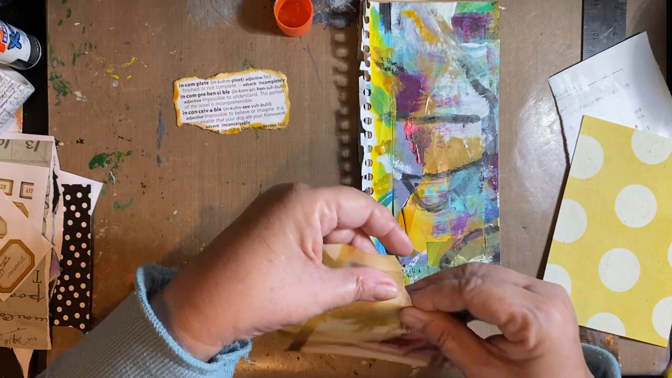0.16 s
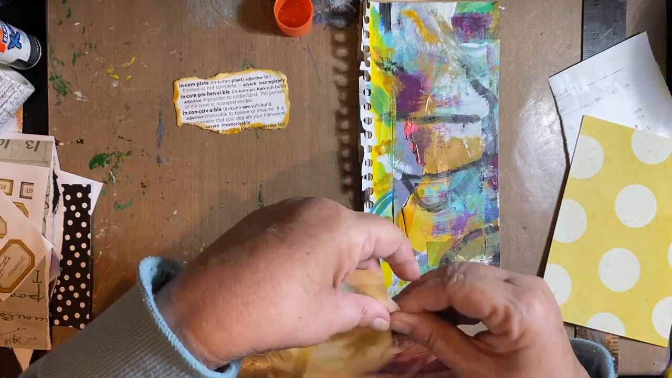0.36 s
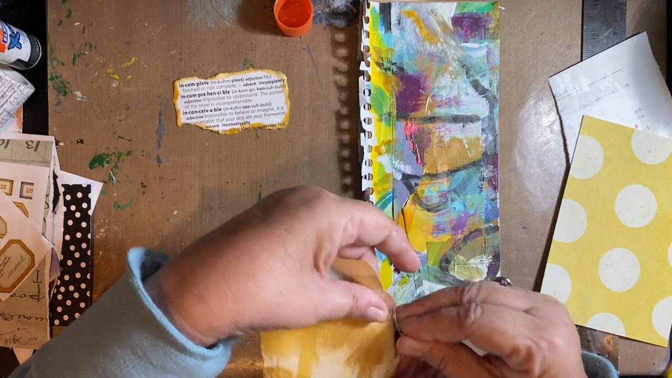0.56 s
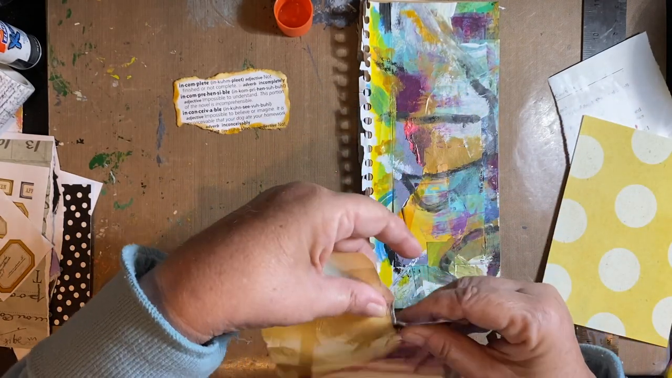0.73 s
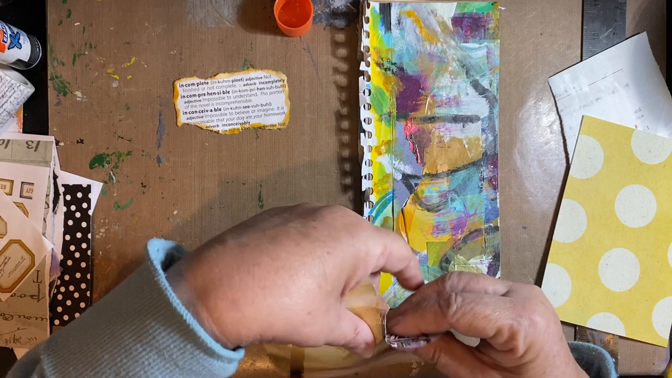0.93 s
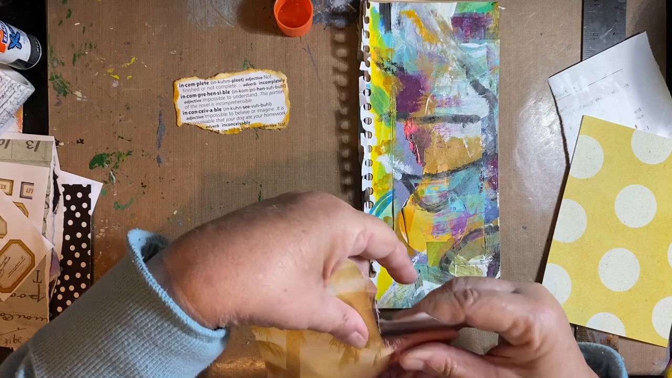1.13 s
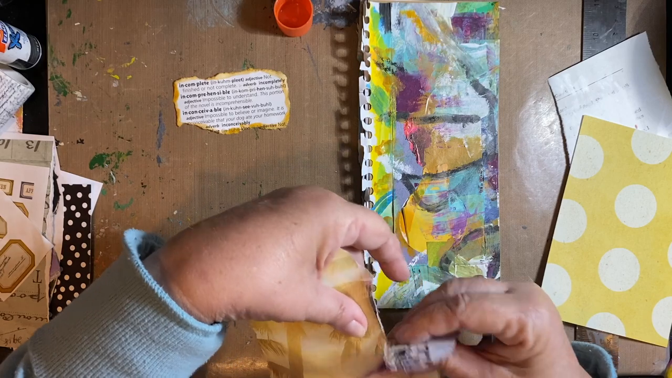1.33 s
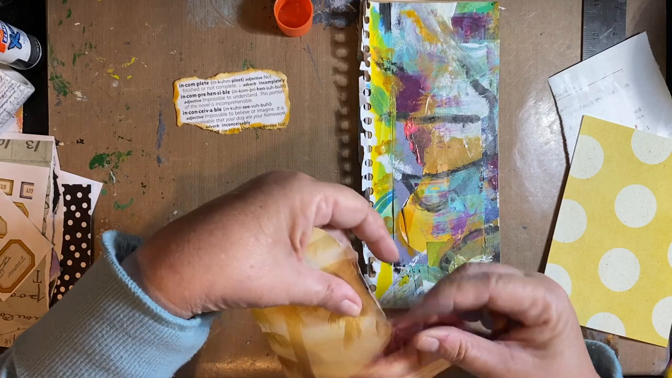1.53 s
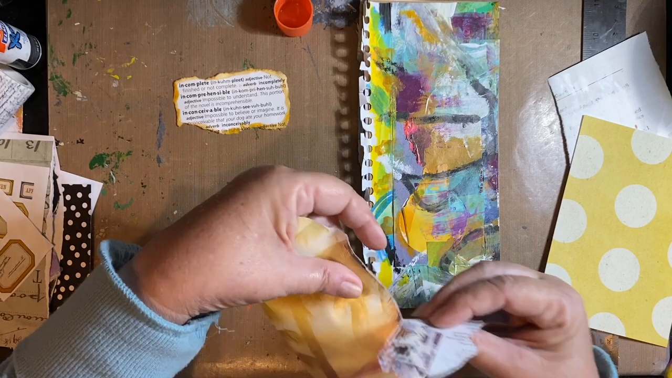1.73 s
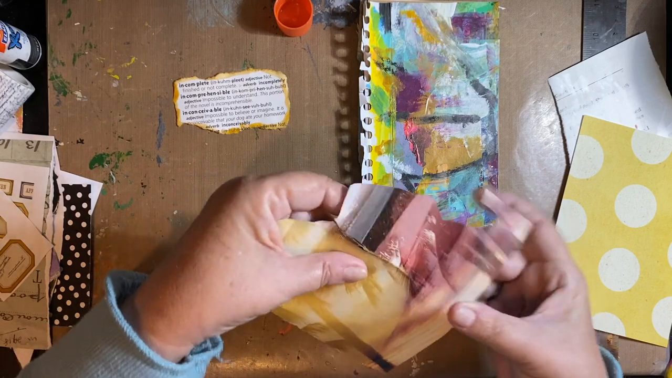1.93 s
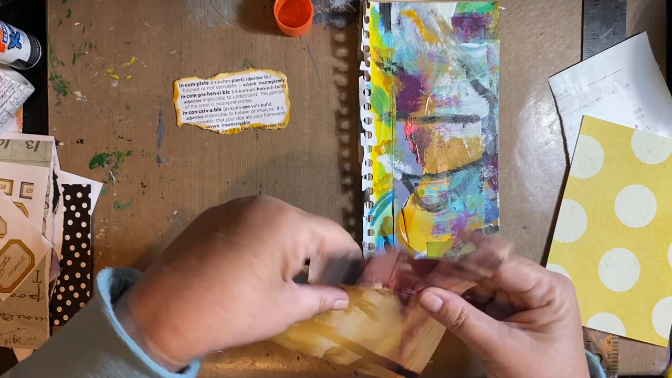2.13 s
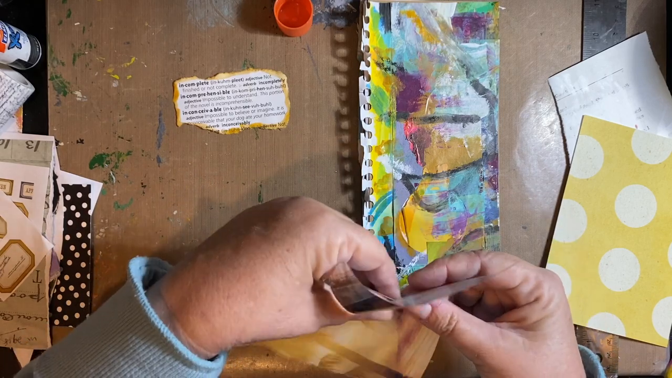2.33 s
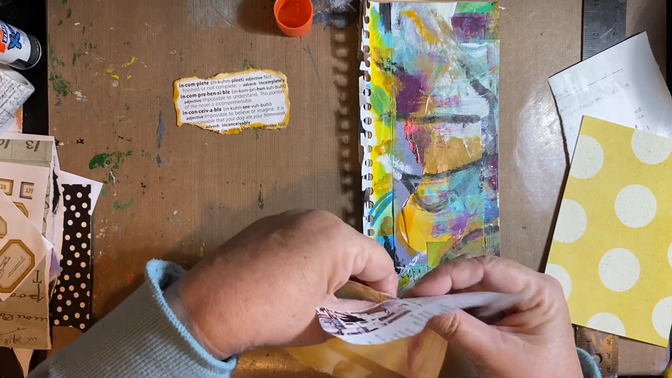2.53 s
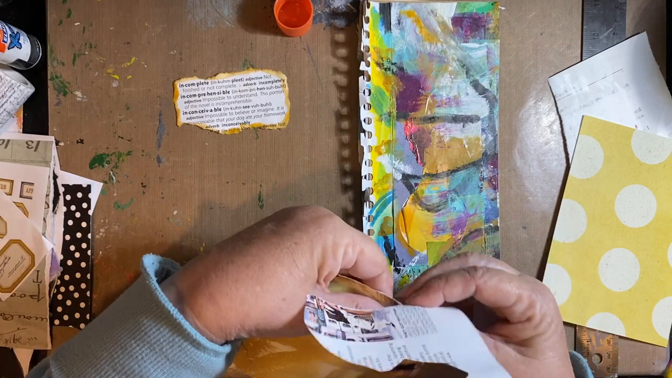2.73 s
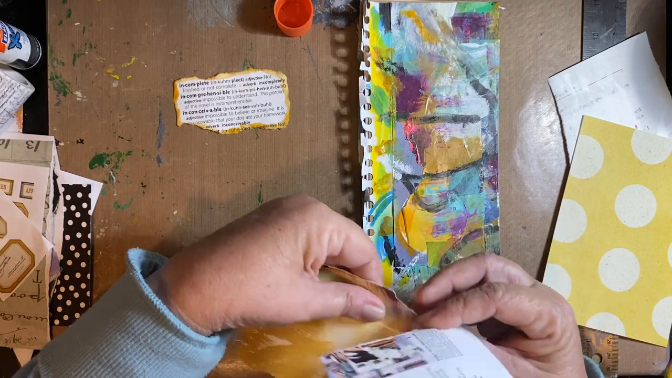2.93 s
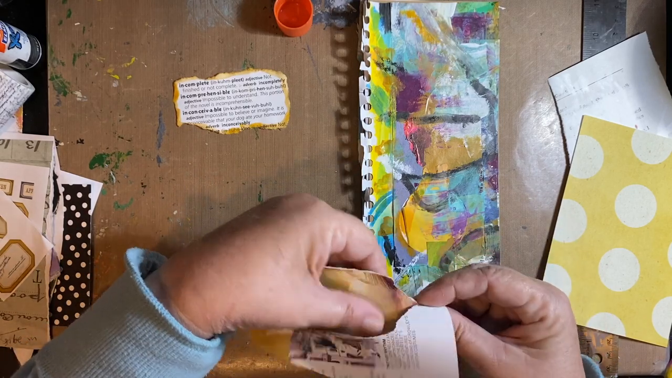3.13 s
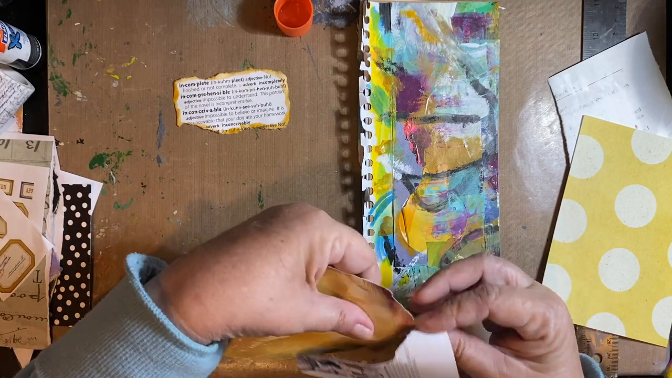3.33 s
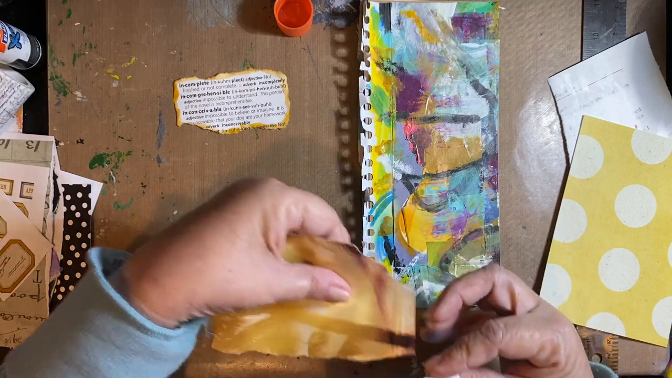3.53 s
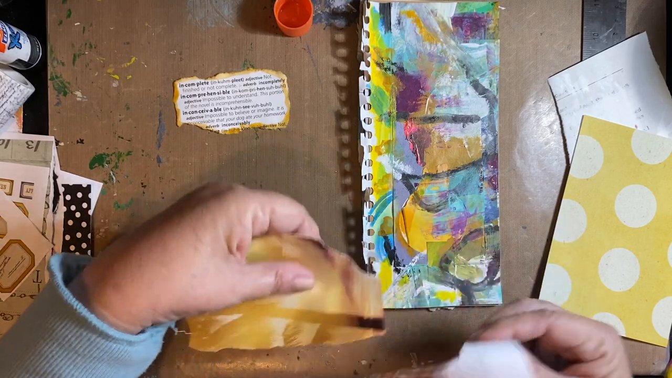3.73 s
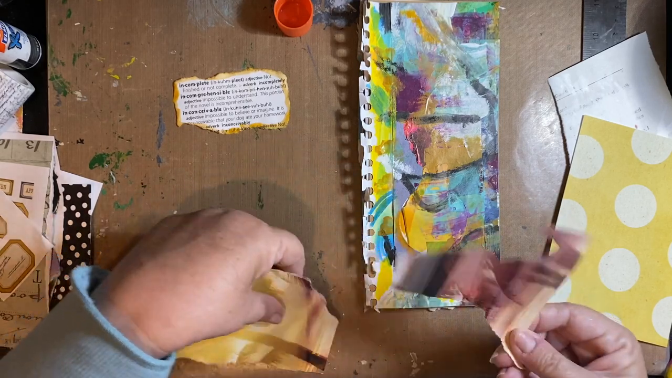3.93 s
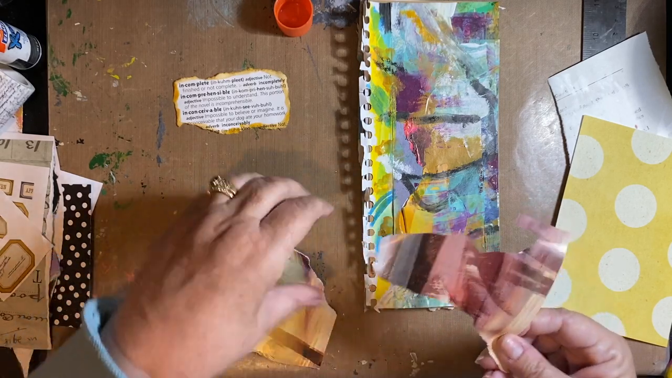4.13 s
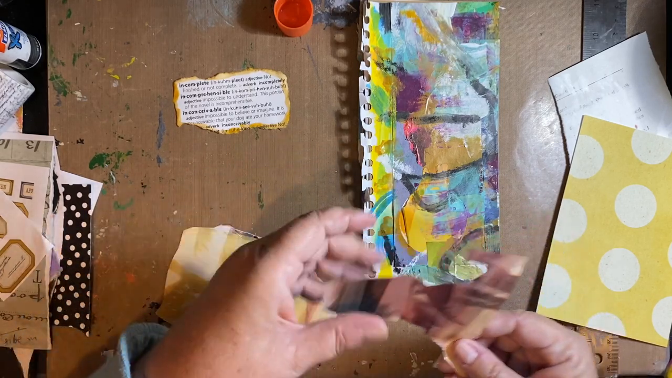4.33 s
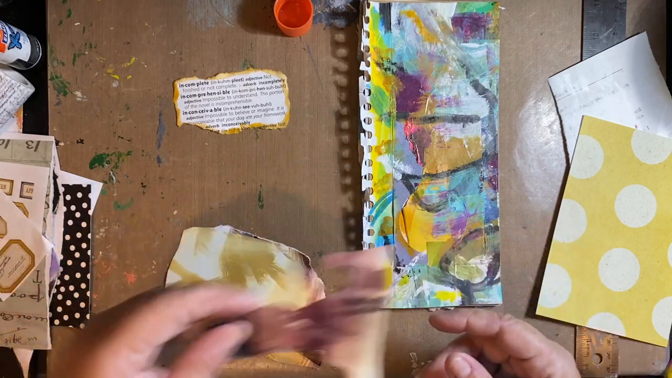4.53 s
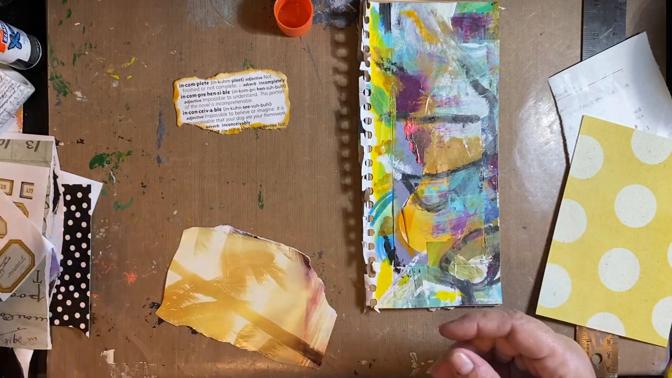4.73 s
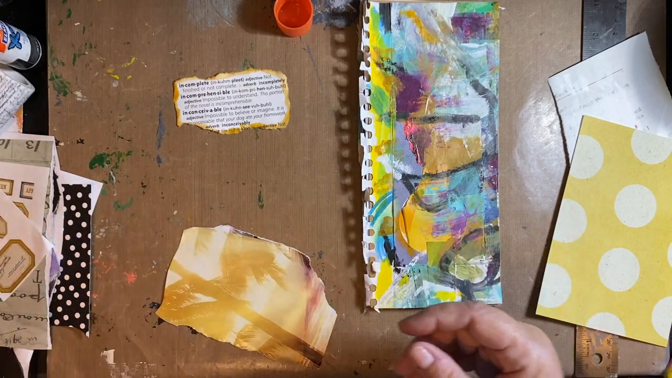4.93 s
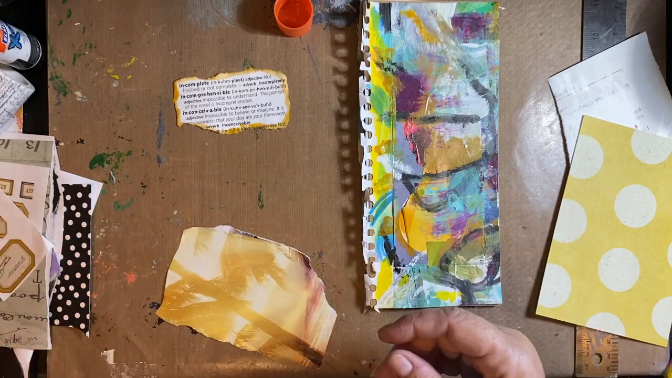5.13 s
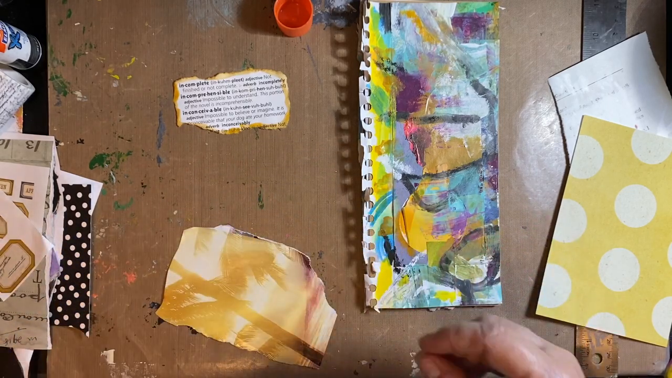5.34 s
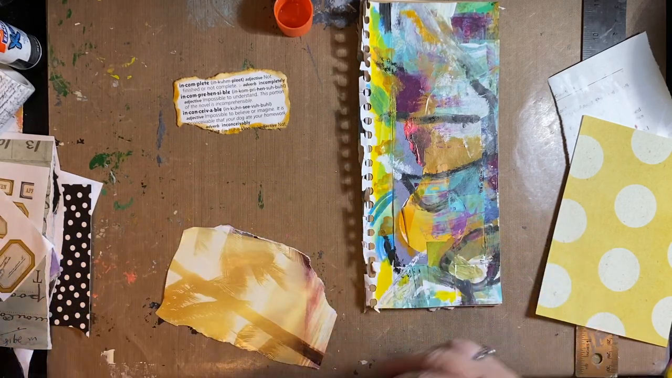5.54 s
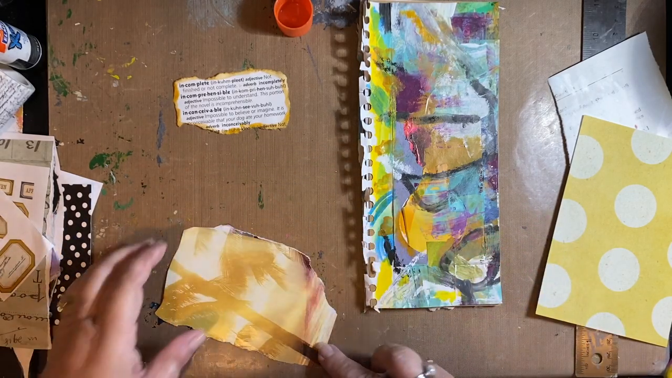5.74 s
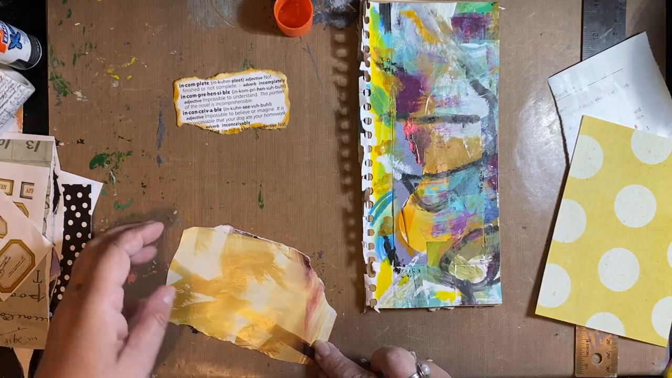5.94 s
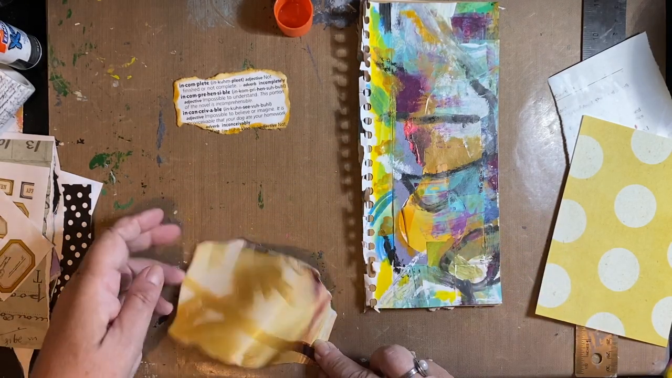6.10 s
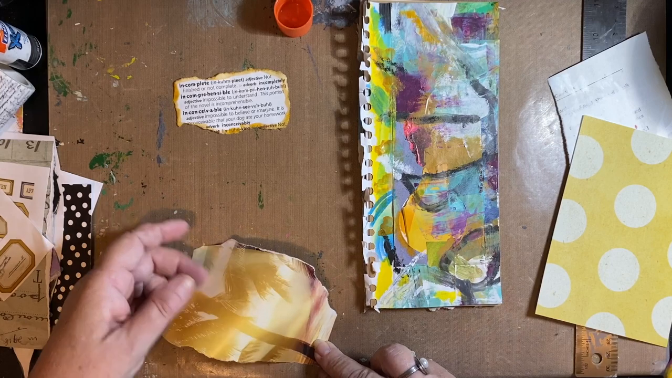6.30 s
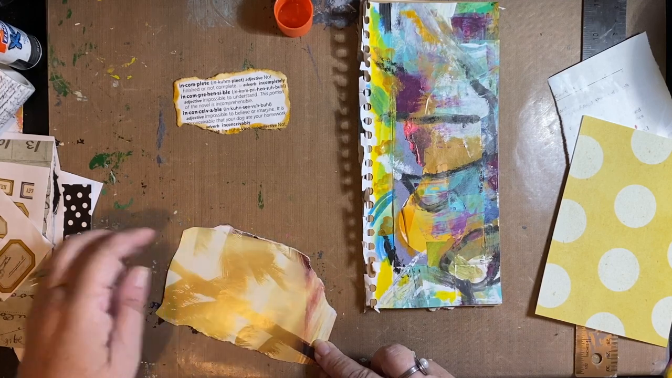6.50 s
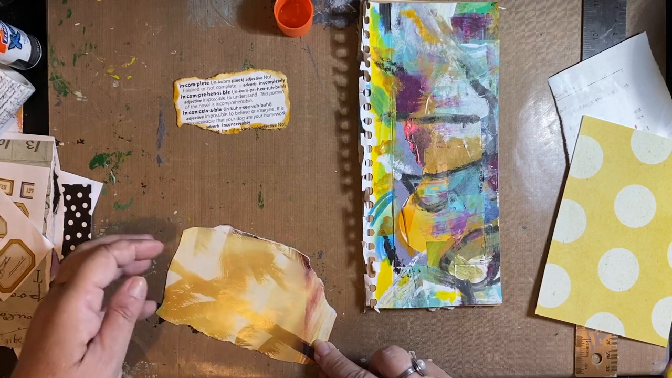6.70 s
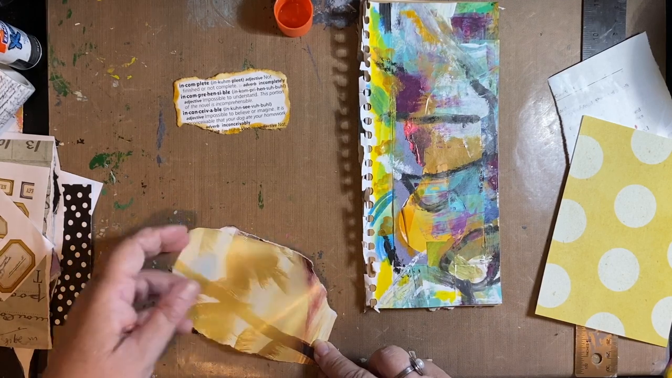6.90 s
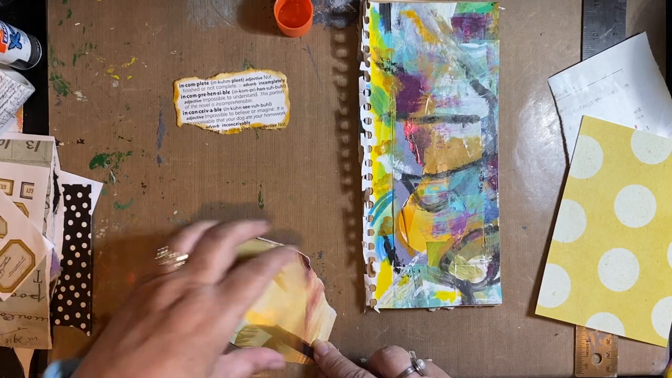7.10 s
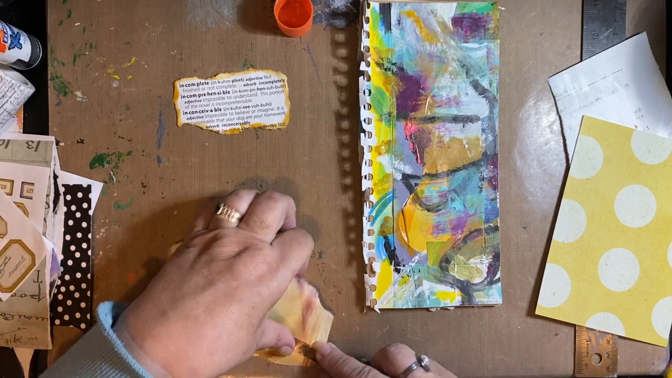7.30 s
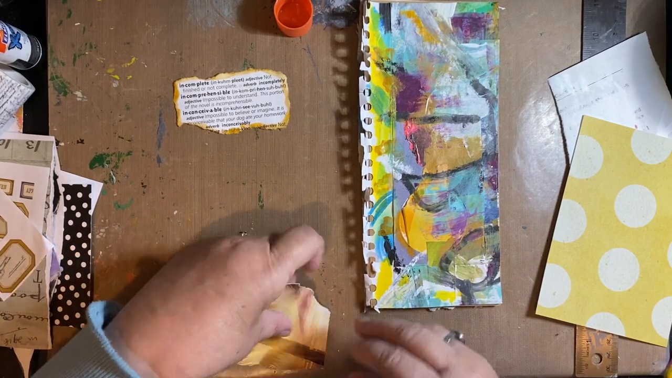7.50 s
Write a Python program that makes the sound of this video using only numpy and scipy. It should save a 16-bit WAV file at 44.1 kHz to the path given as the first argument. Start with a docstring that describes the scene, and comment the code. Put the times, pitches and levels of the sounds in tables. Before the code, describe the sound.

Paper is torn by hand in six short rips, then rustled, slid and pressed onto a wooden table.

```python
"""Tearing paper at a craft table

Hands tear a glossy sheet in six short rips over a wooden table, close under a phone's two mic ports.
Fibres break in stick-slip trains and the held sheet booms and rings. Between rips the paper rustles,
snaps, ticks and taps; later it is nudged, slid and pressed onto the table by a palm.
The room is small and quiet, and answers faintly over a low rumble."""
import sys
import numpy as np
from scipy import signal
from scipy.fft import rfft, irfft, next_fast_len
from scipy.io import wavfile
from scipy.ndimage import uniform_filter1d

SR = 44100
rng = np.random.default_rng(int(sys.argv[2]) if len(sys.argv) > 2 else 0)


def store_wav(level_fs):
    """Save 16-bit WAV to argv[1]."""
    pcm = np.round(np.clip(np.atleast_2d(level_fs), -1, 1) * 32767)
    wavfile.write(sys.argv[1], SR, pcm.T.astype(np.int16))


N = 337806

# spectra of the paper: mid-range body, low boom, fizz of fibres (frequency [Hz], level [dB])
PAPER_BODY = [(500, -25), (900, -3.5), (1500, 0.5), (4000, -2.5), (7000, -4), (9000, -13), (12000, -40),
              (17000, -30.5)]
SHEET_BOOM = [(80, -27.5), (230, -9), (385, 4), (550, -4), (800, -1), (1300, -23)]
FIBRE_FIZZ = [(6000, -14.5), (9000, -4.5), (12000, 4.5), (15500, -2), (17000, -8.5)]


def amp(db):
    """Decibels to gain."""
    return 10 ** (np.asarray(db) / 20)


def unit(x):
    """x scaled to rms 1."""
    return x / np.sqrt(np.mean(x ** 2) + 1e-20)


def along(points, hz):
    """(Hz, value) points read on a log axis."""
    f, v = np.transpose(points)
    return np.interp(np.log(hz + 1), np.log(f + 1), v)


def curves(rows):
    """One value per sample for each column after the time."""
    times, *columns = np.transpose(rows)
    return [np.interp(np.arange(N) / SR, times, column) for column in columns]


def strokes(rows, rise_db_per_s, fall_db_per_s):
    """One gain curve per stroke: it rises, passes three levels and fades."""
    t = np.arange(N) / SR
    return [amp(np.interp(t, row[:3], row[3:6])
                - rise_db_per_s * np.maximum(row[0] - t, 0)
                - fall_db_per_s * np.maximum(t - row[2], 0)) for row in rows]


def filtered(x, response):
    """x times a complex response of frequency."""
    size = next_fast_len(x.shape[-1] + 8192)
    return irfft(rfft(x, size) * response(np.fft.rfftfreq(size, 1 / SR)), size)[..., :x.shape[-1]]


def coloured(x, spectrum):
    """x given a (Hz, dB) spectrum, rms 1."""
    return unit(filtered(x, lambda hz: amp(along(spectrum, hz))))


def modes(rows):
    """The causal response of a few resonances of alternating sign."""
    return lambda f: sum((-1) ** k * amp(db) * 1j * f * width / (hz * hz - f * f + 1j * f * width)
                         for k, (hz, width, db) in enumerate(rows))


def resonance(x, centre_hz, lift_db, width):
    """x through a peak whose centre and height can move; width in natural-log units of pitch."""
    hz, t, z = signal.stft(x, SR, nperseg=512)
    at = np.minimum((t * SR).astype(int), N - 1)
    bell = np.exp(-(np.log((hz[:, None] + 1) / centre_hz[at]) / width) ** 2)
    lift = amp(np.broadcast_to(lift_db, N)[at] * bell)
    z = z * lift / np.sqrt(np.mean(lift[10:80] ** 2, axis=0))  # rms gain 1 over 0.9-6.8 kHz
    return signal.istft(z, SR, nperseg=512)[1][:, :N]


def crackle(per_s, spread_db, t60, bed, patchy_db):
    """Two noises under one train of sudden slips of random size, with drifting patches of colour."""
    chance, size = rng.random((2, N))
    slips = (chance < per_s / SR) * amp(-spread_db * np.log(size + 0.014))
    decays = signal.lfilter([1], [1, -amp(-60 / (t60 * SR))], slips)
    shape = bed + unit(uniform_filter1d(decays, size=16))
    shape /= np.sqrt(np.abs(uniform_filter1d(shape ** 2, size=1500)))  # a steady pull evens the energy
    z = signal.stft(shape * rng.standard_normal((2, N)), nperseg=256)[2]
    patches = uniform_filter1d(rng.standard_normal(z.shape[1:]), size=2, axis=0)
    patches = unit(uniform_filter1d(patches, size=6, axis=1))
    return signal.istft(z * amp(patchy_db * patches), nperseg=256)[1][:, :N]


def room_tone():
    """The air of the room: a faint, steady hiss."""
    # spectrum of the air (frequency [Hz], level [dB])
    hiss = [(200, 4.5), (450, -7.5), (800, -19), (1100, -7.5), (1500, -8), (4000, -11.5), (6000, -14),
            (9000, -17), (13000, -20.5), (17000, -31.5)]
    return amp(-78) * coloured(rng.standard_normal((2, N)), hiss)


def room_answer(x):
    """The walls answer about 6 ms late; the treble dies first."""
    # decay of the room (frequency [Hz], t60 [s])
    decay = [(200, .16), (2000, .13), (10000, .08)]
    hz, t, z = signal.stft(rng.standard_normal((2, SR // 3)), SR, nperseg=256)
    tail = signal.istft(z * amp(-60 * t / along(decay, hz)[:, None]), SR, nperseg=256)[1]
    delayed = np.pad(x, ((0, 0), (250, 0)))
    return signal.fftconvolve(delayed, tail / np.linalg.norm(tail[0]), axes=1)[:, :N]


def table_rumble():
    """The table carries an uneven rumble from arms and house."""
    # shaking of the table (time [s], level [dB])
    shaking = [(0.0, -60.5), (0.28, -60.5), (0.51, -54), (0.7, -56.5), (0.89, -60), (1.0, -55.5),
               (1.43, -58), (1.58, -55), (1.75, -56.5), (2.45, -58), (2.58, -59.5), (3.73, -64),
               (3.88, -58.5), (3.97, -61), (4.1, -57), (4.16, -81.5), (4.3, -81), (4.4, -62), (4.5, -73.5),
               (4.67, -76), (4.88, -66.5), (4.97, -78), (5.03, -68), (5.12, -74.5), (5.29, -62),
               (5.4, -63.5), (5.91, -61.5), (6.34, -66.5), (6.45, -69.5), (6.62, -64.5), (6.75, -58.5),
               (6.88, -55.5), (6.95, -71), (7.05, -68.5), (7.15, -63), (7.36, -57), (7.66, -59.5)]
    # its spectrum (frequency [Hz], level [dB])
    spectrum = [(12, -41.5), (20, -15.5), (59, -1.5), (102, 1), (135, 1.5), (343, -17), (500, -36),
                (650, -61.5), (1100, -120)]
    lumps = amp(2 * unit(uniform_filter1d(rng.standard_normal(N), size=2500)))
    return amp(curves(shaking)[0]) * unit(lumps * coloured(rng.standard_normal((2, N)), spectrum))


def palm_thuds():
    """A palm settles unevenly and thuds in the table top."""
    # landings of the palm (time [s], relative force [dB])
    landings = [(7.219, -31.5), (7.249, -42), (7.359, -44), (7.42, -41)]
    # modes of the wooden top (frequency [Hz], width [Hz], level [dB])
    table_top = [(78.5, 29, 3), (159, 190, -0.5), (257, 75, 3.5), (690, 287, -4)]
    rise_s = 0.0061
    age = np.arange(SR // 8) / SR / rise_s
    force = np.zeros(N + SR)
    for start, db in landings:
        flesh = 1 + unit(uniform_filter1d(rng.standard_normal(len(age)), size=60))
        force[round(start * SR):][:len(age)] += amp(db + 2.5) * age * np.exp(1 - age) * flesh
    return filtered(force[:N], modes(table_top))


def slides():
    """Paper swishes over the table; the hollow under it lends a moving resonance."""
    # slides of the sheet (start [s], fastest [s], stop [s], level at each of the three [dB],
    # hollow from [Hz], to [Hz], its height [dB], dull scrape [dB])
    moves = [(4.04, 4.05, 4.072, -45, -45, -52, 1350, 1750, 15, 0),
             (5.012, 5.028, 5.05, -62, -55, -63, 6000, 2000, 6, -3),
             (5.202, 5.225, 5.255, -58, -55, -60, 5000, 5500, 3, -20),
             (6.04, 6.07, 6.085, -56, -52, -57, 3800, 4200, 11, -6),
             (6.15, 6.2, 6.255, -42, -48, -52, 2100, 2300, 14, 0),
             (6.275, 6.288, 6.352, -51, -47, -54, 2200, 2700, 13, 0),
             (6.69, 6.75, 6.785, -62, -58, -64, 2300, 2300, 9, -3),
             (6.81, 6.925, 6.975, -56, -46, -58, 5000, 2200, 12, -6),
             (7.25, 7.325, 7.48, -52, -42, -56, 3900, 3200, 5, -1)]
    # spectrum of paper on wood (frequency [Hz], level [dB])
    swish = [(500, -53), (1000, -9), (1500, 0.5), (2500, -2), (6500, 3), (9000, -8.5), (12000, -23.5),
             (17000, -32)]
    motion = sum(strokes(moves, rise_db_per_s=1497.5, fall_db_per_s=603))
    hollow_hz, hollow_db, scrape_db = curves(
        [point for row in moves for point in [(row[0], row[6], *row[8:]), (row[2], *row[7:])]])
    friction = crackle(per_s=300, spread_db=3.5, t60=0.02, bed=1.8, patchy_db=4)
    body = resonance(coloured(friction, swish), np.full(N, 1400.), scrape_db, width=0.55)
    body = resonance(body, hollow_hz, hollow_db, width=0.22)
    return motion * (body + amp(-12) * coloured(friction, FIBRE_FIZZ))


def rustle():
    """Skin drags on paper in small slips; the centre pitch of the rustle wanders."""
    # fingers shifting on the sheet (time [s], rustle [dB], dull part [dB])
    handling = [(0.0, -68.5, -68), (0.05, -50, -62), (0.095, -66, -60), (0.17, -48.5, -59),
                (0.23, -56, -46.5), (0.28, -50, -59.5), (0.325, -47.5, -57), (0.355, -63, -55),
                (0.41, -49.5, -58), (0.55, -51.5, -74), (0.62, -48.5, -50.5), (0.66, -48, -50.5),
                (0.71, -60, -63.5), (0.75, -46, -56), (0.77, -55.5, -62.5), (0.79, -49.5, -70),
                (0.81, -64.5, -98), (0.86, -43, -48), (0.92, -60.5, -56.5), (1.1, -56, -47.5),
                (1.16, -62, -59.5), (1.24, -67.5, -87), (1.42, -50, -59), (1.56, -63.5, -58),
                (1.62, -59, -73), (1.82, -50, -51.5), (1.92, -71, -69), (1.965, -61.5, -72),
                (2.0, -52.5, -60), (2.028, -48, -52), (2.07, -52.5, -58.5), (2.085, -63, -54),
                (2.16, -70.5, -67), (2.2, -53.5, -55), (2.24, -53, -53), (2.28, -52, -51),
                (2.31, -54, -56.5), (2.33, -57.5, -48.5), (2.39, -57, -70.5), (2.462, -46, -53),
                (2.59, -64, -72.5), (2.64, -47.5, -54.5), (2.7, -50.5, -67.5), (2.95, -51, -62.5),
                (3.0, -55, -61), (3.034, -52, -66), (3.1, -50, -61.5), (3.15, -60.5, -64),
                (3.196, -62, -60), (3.27, -51, -57), (3.5, -61.5, -66), (3.6, -72, -79),
                (3.716, -49, -72.5), (3.98, -63, -70), (4.06, -67.5, -56.5), (4.15, -90.5, -85.5),
                (4.35, -79, -90), (4.41, -57.5, -77), (4.5, -58.5, -85), (4.58, -66, -88.5),
                (4.66, -60, -83), (4.72, -62.5, -87), (4.77, -62.5, -85.5), (4.82, -69, -83),
                (4.85, -62, -82), (4.89, -74.5, -83.5), (4.97, -70, -79), (5.1, -79.5, -80.5),
                (5.72, -79, -74.5), (5.8, -68, -56.5), (5.86, -72.5, -82), (5.92, -63, -59),
                (6.08, -60.5, -80), (6.19, -59.5, -49), (6.25, -56, -87.5), (6.36, -68, -92),
                (6.46, -98.5, -91), (6.6, -71, -72), (6.758, -59.5, -59), (6.87, -56.5, -72),
                (7.04, -78.5, -82), (7.22, -88, -73), (7.356, -47, -52.5), (7.44, -50, -51.5),
                (7.51, -62, -66), (7.54, -54.5, -67), (7.66, -63.5, -71)]
    # spectrum of skin on paper (frequency [Hz], level [dB])
    skin = [(500, -33.5), (800, -19.5), (1050, 2), (1500, -1), (2500, -7.5), (4000, -2.5), (6500, 3),
            (9000, -12.5), (12000, -20), (17000, -31)]
    # wandering centre pitch of the rustle (time [s], centre [Hz])
    centre = [(0.0, 1550), (0.68, 1780), (1.09, 4020), (1.13, 1870), (1.71, 2990), (2.3, 1390),
              (2.79, 4230), (2.86, 2270), (3.71, 2850), (4.14, 1580), (4.18, 4080), (4.61, 2755),
              (5.27, 4470), (5.33, 1120), (6.44, 3293), (6.48, 1526), (6.87, 4320), (7.21, 1120),
              (7.25, 3310), (7.66, 1410)]
    rustle_db, dull_db = curves(handling)
    drag = crackle(per_s=310, spread_db=6, t60=0.012, bed=2, patchy_db=3)
    body = resonance(coloured(drag, skin), curves(centre)[0], lift_db=5, width=0.45)
    fizz = amp(-9.5) * coloured(drag, FIBRE_FIZZ)
    return amp(rustle_db) * (body + fizz) + amp(dull_db) * coloured(drag, SHEET_BOOM)


def snaps():
    """Short paper snaps, ticks and taps: quick bursts, each ringing briefly at its own pitch."""
    # snaps, ticks and taps (time [s], peak [dB], pitch [Hz], broad crack [dB], dull part [dB],
    # bright part [dB], for very dry or soft ones also t60 [s])
    ticks = [(0.021, -34.5, 3770, 1.5, -20, -2.5), (0.04, -39, 4520, -3.5, -4, -1),
             (.064, -30.5, 3740, 0, -5, 3.5), (0.184, -28, 802, -5.5, -4.5, -22),
             (0.41, -38.5, 2774, -6.5, -19, -7), (0.436, -39.5, 3970, -3.5, -19, -4.5),
             (.456, -33, 4530, -6, -18.5, -10.5), (0.469, -21, 891, -8.5, -20, -5.5),
             (0.495, -20.5, 2760, 1, -4, -14.5), (.514, -14, 3100, -4, -13.5, -15.5),
             (.526, -12, 900, -8, -4, -20, .03), (0.588, -35, 2478, -5.5, -7, -10),
             (.613, -30, 1122, -7, 3, -31.5), (.731, -25.5, 2346, 5.5, -13.5, -26),
             (.842, -37, 2320, 3.5, -2.5, -22.5), (.93, -27, 4000, 0, -19, -5),
             (0.94, -24, 1580, -9.5, -19, -2.5), (0.977, -17, 1374, -5, -19, -11),
             (1.056, -24, 3000, -3, -22, -10, .025), (1.062, -15.5, 4600, -6, -22, -17, .022),
             (1.122, -26, 1154, -2, 0.5, -24), (1.255, -46.5, 1118, -17, -17.5, -23),
             (1.302, -23, 2033, -2.5, -14, -12.5), (1.334, -17.5, 3074, -1.5, -23, -12),
             (1.348, -11.5, 2607, 6, -15, -15.5, .025), (1.357, -14, 1132, -11.5, -6, -12.5),
             (1.37, -12.5, 4680, -9, -15, -11), (1.419, -24.5, 4330, -4, -12, -1.5),
             (1.481, -29.5, 1360, -3, 2.5, -15.5), (1.544, -22.5, 2600, -2, -4, -11.5, .055),
             (1.63, -30.5, 2000, -3, -23, -7.5), (1.639, -20, 4800, -1, -4.5, -12.5),
             (1.662, -20, 2570, -2, -10, -14, .045), (1.681, -18, 4455, -5, -5, 0),
             (1.703, -15.5, 900, 0.5, -10, -5.5), (1.714, -17, 3500, 0, -10, -5),
             (1.759, -22, 2800, 0, -12, -5), (1.838, -29, 4200, -1, -3, -8.5, .08),
             (1.971, -37.5, 4940, -8, -10, -10), (2.008, -34, 1102, -9.5, -8, -21),
             (2.09, -37, 1138, -18, -12, -34.5), (2.119, -40, 1141, -12.5, -10, -30),
             (2.142, -42.5, 1104, -15, -9.5, -26.5), (2.184, -28.5, 1370, 7.5, -9, -14, .015),
             (2.211, -24, 2197, -1, 0.5, -6.5, .06), (2.323, -32.5, 1650, -5, -8, -27.5),
             (2.337, -27.5, 1110, -18, -13.5, -29), (2.413, -30, 2346, -5, -9, -3.5),
             (2.439, -28.5, 1675, -0.5, 3.5, -4.5), (2.498, -38.5, 897, -10.5, -6, -25.5),
             (2.532, -43, 1190, -11.5, -10.5, -25.5), (2.604, -40, 3000, 0, -15, -15),
             (2.612, -16.5, 1595, 2.5, -4.5, -15.5, .025), (2.621, -26, 900, -12, -3, -30),
             (2.744, -25, 4330, -16.5, -26.5, 0), (2.759, -20, 5584, -9, -22.5, -0.5, .022),
             (2.723, -34, 5500, -8, -25, -8, .015), (2.768, -20, 5500, -10, -25, -3),
             (2.785, -10.5, 5810, -23.5, -24.5, -3.5), (2.814, -17, 3500, -5.5, -17.5, -8.5, .06),
             (2.851, -13, 4500, -5, -22, -14, .025), (2.867, -14, 3500, -6.5, -15, -17.5),
             (2.88, -9.5, 1230, -4, -19, -15.5), (2.889, -11, 1332, -3, -21.5, -15.5, .025),
             (2.9, -11, 3854, -1.5, -15, -15.5), (3.171, -37.5, 834, -11.5, -15.5, -35.5),
             (3.189, -36.5, 1309, -7, -3.5, -22), (3.207, -35, 814, -10, 6.5, -21.5),
             (3.278, -15, 1294, 1.5, -27.5, -6, .035), (3.295, -22, 1190, -5.5, -15.5, -15),
             (3.315, -18, 1270, -3, -12, -11.5), (3.328, -11.5, 1240, -16.5, -16.5, -10.5),
             (3.357, -12, 6000, -5, -12, -8), (3.382, -14, 3750, -5, -10, -15),
             (3.449, -17, 7500, -8, -7.5, -10.5), (3.47, -21, 1225, -5, -7.5, -24.5),
             (3.482, -27, 770, -9, 1.5, -25), (3.508, -29, 4860, -3, -8, -10.5, .08),
             (3.706, -25, 1342, 4, -5, -30, .018), (3.775, -35.5, 1206, -8, 2.5, -28, .06),
             (3.844, -29, 2150, -6, -7.5, -33, .022), (3.889, -31, 1943, -0.5, -11.5, -32.5),
             (3.916, -39, 2170, -4, -11.5, -28), (4.009, -29.5, 1710, 3, -0.5, -22.5, .025),
             (4.222, -28, 4500, -6, -53, -20, .022), (4.363, -40, 1552, -6, -6, -30),
             (4.385, -24.5, 2960, 1.5, -4, -23.5), (4.655, -40.5, 2170, -9, -10, -18.5),
             (5.198, -51, 6000, 3, -38, -8, .015), (5.72, -43.5, 1580, -18, -20, -44),
             (5.739, -17, 1490, -25.5, -29, -56.5, .035), (5.93, -38.5, 1170, -12.5, 3.5, -13.5),
             (6.014, -43, 1156, -2, 10.5, -25), (6.041, -42, 3610, -26.5, -26.5, -12),
             (6.112, -28, 2460, -5, -22.5, -28), (6.118, -16.5, 2430, -9, -34.5, -27),
             (6.13, -16, 2110, -6, -33, -24), (6.16, -31, 2287, 6.5, -10.5, -27),
             (6.284, -36, 2280, -18, -30, -29), (6.357, -28, 3200, -15, -35, -17.5, .025),
             (6.368, -23, 3600, -10, -40, -18, .012), (6.573, -53, 1360, -3.5, -0.5, -23),
             (6.798, -37, 3000, -1.5, 8.5, -20.5, .025), (6.844, -34.5, 5220, -25, -20, -9),
             (6.856, -36, 3750, -35, -18.5, -19), (6.977, -37, 2420, -9.5, -29, -31.5, .02),
             (7.22, -35, 803, -21.5, 9.5, -45), (7.266, -30.5, 4120, 1.5, -14.5, -24),
             (7.297, -32.5, 3320, 0.5, -4, -20), (7.325, -22.5, 1620, 2.5, -15, -33),
             (7.363, -27.5, 1680, 1, -5.5, -22.5), (7.405, -24.5, 3240, -3.5, -9.5, -29.5),
             (7.454, -28.5, 1420, 1.5, -4, -15), (7.485, -35.5, 1480, -7, -5.5, -20.5),
             (7.524, -41.5, 1400, -10.5, -21, -19.5), (7.572, -32.5, 1490, -12.5, -37, -24.5),
             (7.596, -29.5, 1414, -2.5, -18, -18)]
    base_t60_s, ring_cycles = 0.028, 20
    attack_share, width_share = 0.05, 0.53  # of the t60; of the pitch
    out, t = np.zeros((2, N + SR)), np.arange(SR // 8) / SR
    for start, db, hz, crack_db, dull_db, bright_db, *own_t60 in ticks:
        t60 = own_t60[0] if own_t60 else base_t60_s + ring_cycles / hz
        shape = amp(-60 * (t / t60) ** 0.9) * (1 - np.exp(-t / (attack_share * t60)))
        burst = shape * rng.standard_normal((2, len(t)))
        ring = modes([(hz, width_share * hz, 0)])
        snap = filtered(burst, lambda f: amp(along(PAPER_BODY, f) + crack_db) + ring(f) ** 2
                        + amp(along(SHEET_BOOM, f) + dull_db) + amp(along(FIBRE_FIZZ, f) + bright_db))
        out[:, round(start * SR):][:, :len(t)] += amp(db) * snap / np.abs(snap[0]).max()
    return out[:, :N]


def rips():
    """Fibres break in a dense stick-slip train; the sheet booms and rings with it."""
    # the rips (start [s], hardest pull [s], release [s], level at each of the three [dB],
    # boom at the start [dB], fizz [dB])
    tears = [(0.457, 0.52, 0.553, -43, -22.5, -29, -14, -11),
             (0.94, 0.998, 1.044, -31, -26.5, -30.5, -23, -4.5),
             (1.303, 1.36, 1.4, -25, -27, -29, -19.5, -7), (1.679, 1.71, 1.768, -30, -27, -36.5, -15, 1.5),
             (2.788, 2.89, 2.913, -33, -20, -26, -23, -4), (3.316, 3.36, 3.46, -28, -24, -28, -15.5, -1.5)]
    # the flap between the fingers, rip by rip (low ring from [Hz], to [Hz], its height from [dB],
    # to [dB], high ring from [Hz], to [Hz], its height [dB])
    flap_rings = [(1450, 900, 8, 12, 4200, 2600, 5), (1550, 850, 6, 10, 5800, 4200, 4),
                  (2000, 1000, 4, 4, 3000, 3300, 4), (1300, 1000, 4, 3, 4400, 3300, 5),
                  (1350, 1250, -5, 11, 6000, 3400, 5), (1250, 800, 6, 3, 5500, 3700, 4)]
    # modes of the held sheet (frequency [Hz], width [Hz], level [dB])
    sheet = [(770, 140, 7.5), (1245, 60, 24), (3132, 320, 19.5), (3580, 150, -1), (6335, 3100, 19.5)]
    boom_db_per_s = 49.5  # the flap booms more as it lengthens
    fibres = crackle(per_s=2200, spread_db=3.5, t60=0.0025, bed=1.1, patchy_db=3.5)
    body = unit(coloured(fibres, PAPER_BODY) + 2 * unit(filtered(fibres, modes(sheet))))
    boom, fizz = coloured(fibres, SHEET_BOOM), coloured(fibres, FIBRE_FIZZ)
    glides = []
    for (start, _, release, *_), ring in zip(tears, flap_rings):
        glides += [(start, *ring[0:5:2], ring[6]), (release, *ring[1:6:2], ring[6])]
    low_hz, low_db, high_hz, high_db = curves(glides)
    body = resonance(body, low_hz, low_db, width=0.25)
    body = resonance(body, high_hz, high_db, width=0.25)
    pulls = strokes(tears, rise_db_per_s=4000, fall_db_per_s=1800)
    out, t = np.zeros((2, N)), np.arange(N) / SR
    for (start, _, release, *_, boom_db, fizz_db), pull in zip(tears, pulls):
        torn_s = np.clip(t, start, release) - start
        out += pull * (body + amp(boom_db + boom_db_per_s * torn_s) * boom + amp(fizz_db) * fizz)
    return out


def stereo_image(pair):
    """Left and right share one wave and differ by another; at 8-11.6 kHz nearly opposite in phase."""
    # left-right likeness of the stereo sound (frequency [Hz], coherence [0-1])
    likeness = [(60, 0.98), (200, 0.95), (400, .92), (600, 0.78), (900, .94), (1500, 0.85), (3000, 0.83),
                (5000, 0.72), (7400, 0.7), (8000, 1), (11600, 1), (12800, .7)]
    # left-right balance (frequency [Hz], left minus right [dB])
    balance = [(60, 0.5), (110, -2.5), (200, -3.5), (380, -3.5), (700, -7.5), (1290, 1.5), (2380, 0),
               (4400, -0.5), (7900, 0), (15000, 0)]
    # left-right phase of the stereo sound (frequency [Hz], lead of the left [rad])
    lead = [(0, 0), (430, -0.3), (950, 1.2), (1380, 0.4), (2240, 1.0), (2580, 0.4), (3010, 1.1),
            (4050, 0.3), (5080, 2.2), (5510, 1.4), (8010, 3.28), (11300, 3.0), (12800, 3.7), (16400, 6.5)]
    angle = lambda hz: np.arccos(np.clip(along(likeness, hz), 0, 1)) / 2
    shared, apart = filtered(pair, lambda hz: np.array([np.cos(angle(hz)), np.sin(angle(hz))]))
    left_right = np.array([shared + apart, shared - apart])
    lean = lambda hz: amp(along(balance, hz) / 2) * np.exp(0.5j * np.interp(hz, *np.transpose(lead)))
    return filtered(left_right, lambda hz: np.array([lean(hz), 1 / lean(hz)]))


def scene():
    """Paper close up, table and room behind it, in stereo."""
    paper = rips() + rustle() + slides() + snaps()
    air = room_tone()
    walls = amp(-15) * room_answer(paper)
    return stereo_image(paper + walls + palm_thuds() + table_rumble() + air)


def record(dry):
    """The phone keeps nothing above its band limit."""
    top_hz, edge_hz = 15850, 200
    return filtered(dry, lambda hz: np.clip((top_hz - hz) / edge_hz + 0.5, 0, 1) ** 2)


dry = scene()
out = record(dry)
store_wav(out)
```